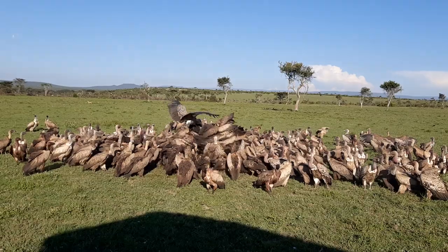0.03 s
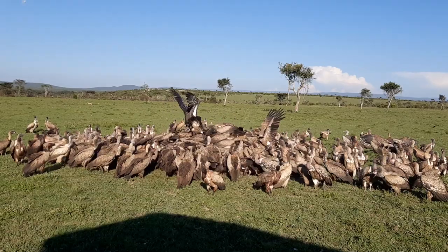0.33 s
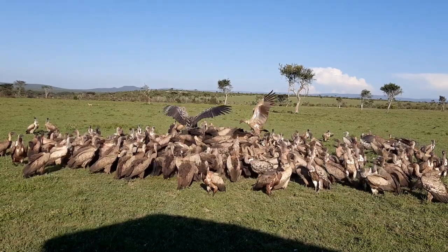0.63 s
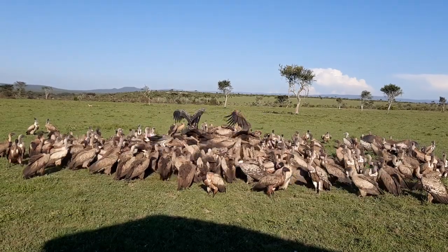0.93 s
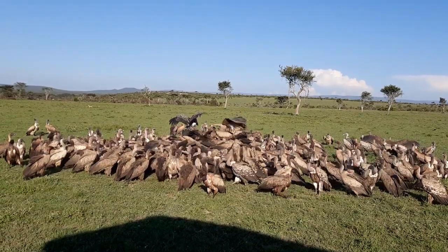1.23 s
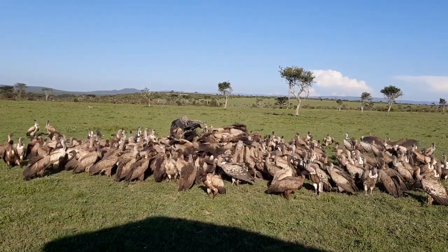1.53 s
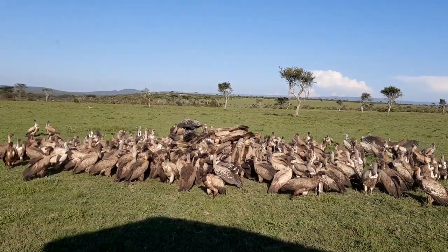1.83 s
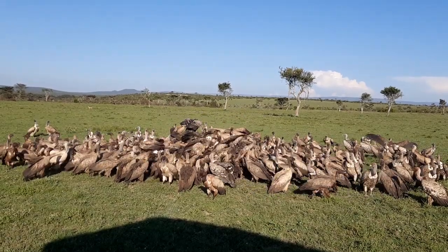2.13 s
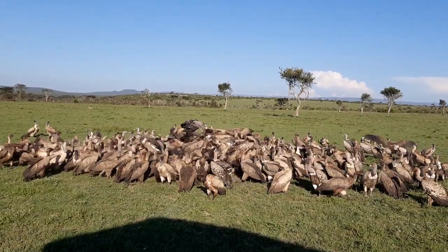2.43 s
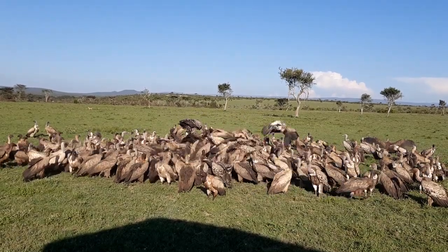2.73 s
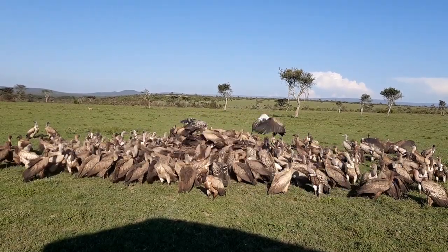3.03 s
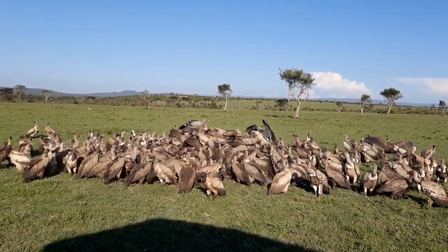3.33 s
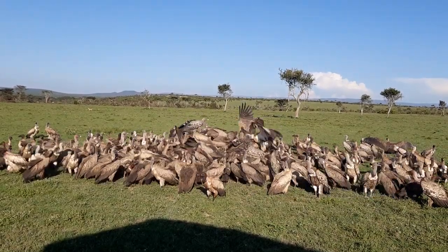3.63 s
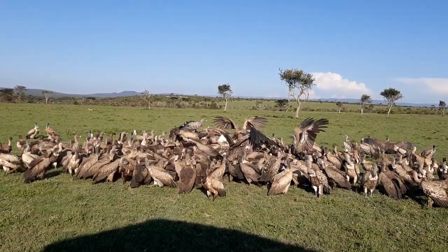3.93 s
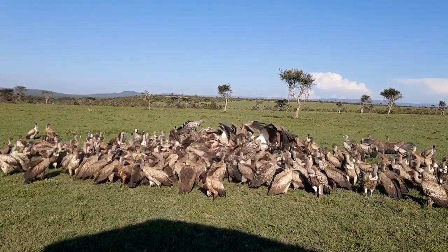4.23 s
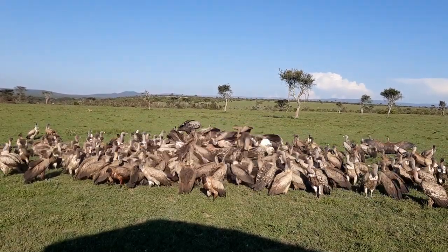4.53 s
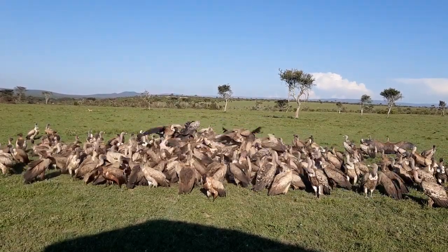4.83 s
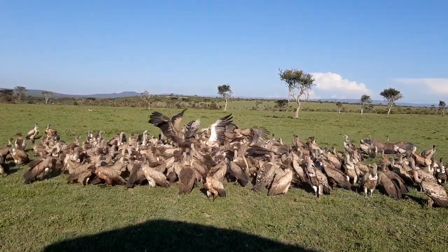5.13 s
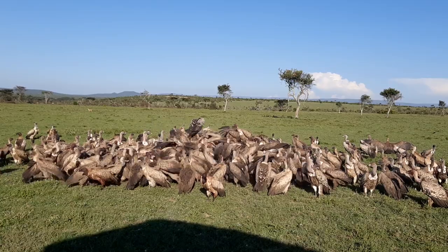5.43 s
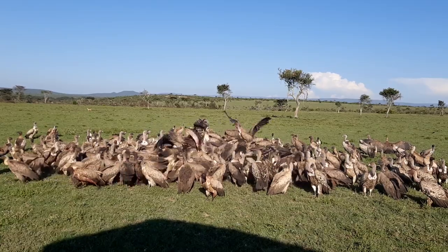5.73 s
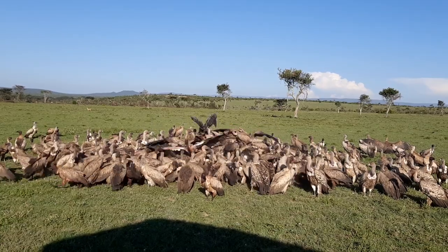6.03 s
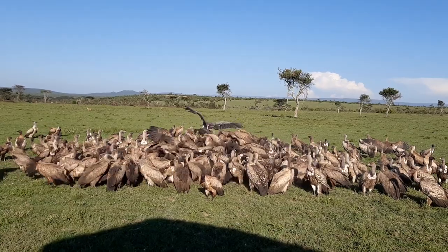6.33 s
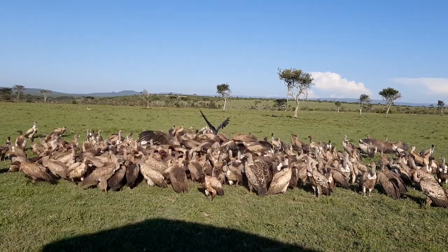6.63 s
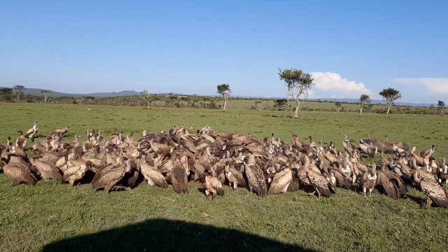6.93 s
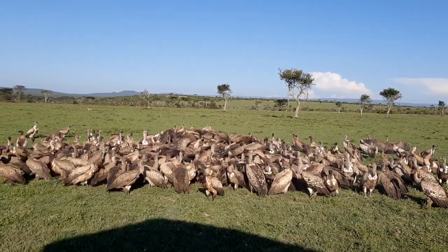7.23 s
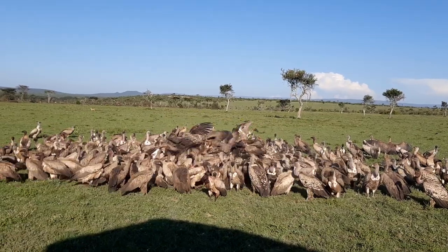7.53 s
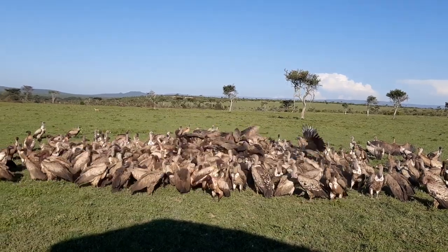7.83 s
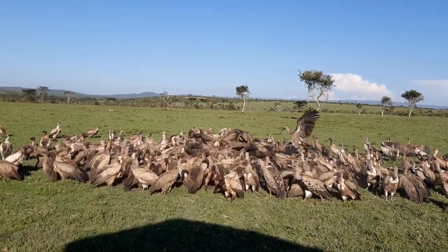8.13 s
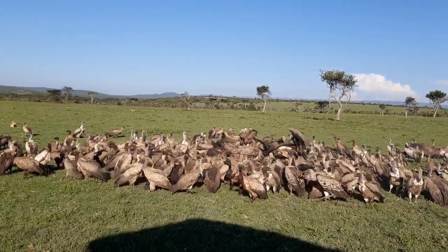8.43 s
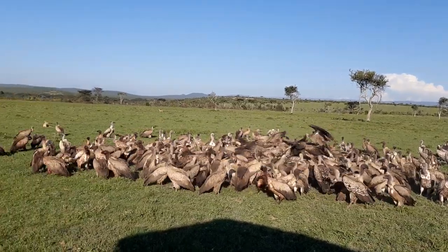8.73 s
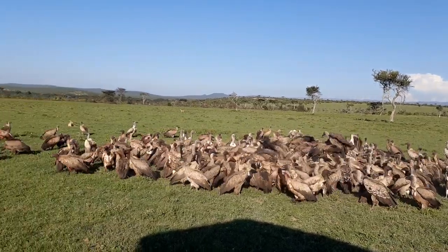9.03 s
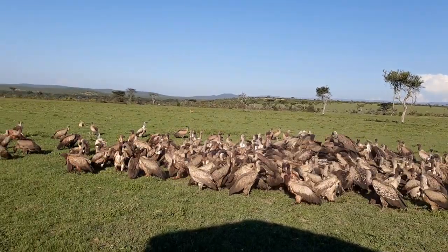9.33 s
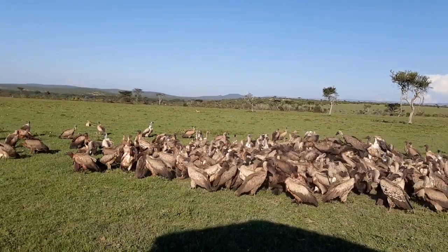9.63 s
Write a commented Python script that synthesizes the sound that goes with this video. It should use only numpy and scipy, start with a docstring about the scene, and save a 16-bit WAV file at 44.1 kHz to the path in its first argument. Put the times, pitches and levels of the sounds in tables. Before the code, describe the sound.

Gusty wind rumbles on the microphone while squabbling vultures give hoarse hisses and rough, falling screeches among dull wing thumps.

```python
"""Vultures squabble over a carcass on open grassland, some metres away, while gusts buffet the microphone.
First they hiss, forcing air through throat and bill, and one screeches. At 3 s come rattling rasps,
then cackles. From 4.7 s they screech again and again, each with two rough, falling tones at once.
Around 6 s bills snap and wings thump. More hisses, brief thin rings near 2 kHz and a last screech
follow; after 9 s the wind dies down. Feet scuffle and feathers rustle all the way through."""
import sys
import numpy as np
from scipy import signal
from scipy.fft import rfft, irfft, next_fast_len
from scipy.io import wavfile
from scipy.ndimage import map_coordinates

SR = 44100
rng = np.random.default_rng(int(sys.argv[2]) if len(sys.argv) > 2 else 0)


def dump_mix(stems):
    """Bounce the given channels to the path in sys.argv[1] as a 16-bit WAV at rate SR."""
    frames = np.atleast_2d(stems).T  # one column per channel
    limited = np.clip(frames, -1, 1)  # hard clip at full scale
    pcm = np.round(limited * 32767).astype(np.int16)
    wavfile.write(sys.argv[1], SR, pcm)


N = 431738
TIME = np.arange(N) / SR
WANDER_SHARE, WANDER_PER_S = 0.01654, 35   # a slack throat keeps changing shape, so its pitch wanders

# Tone colour of brushing feathers: pitch_hz, level_db
FEATHER_SPECTRUM = [(1410, -48), (2400, -6), (2640, -2), (2880, -2.5), (3380, -5.5), (3740, -4),
                    (4050, 0.5), (5350, 2.5), (7590, -2.5), (8550, -12), (11000, -2), (15100, -5),
                    (16000, -7.5)]
# Tone colour of small swirls of wind at the microphone's two openings (ports): pitch_hz, level_db
BUFFET_SPECTRUM = [(80, -20), (170, -3), (330, -2.5), (480, -8), (700, -26), (1200, -37), (3000, -76)]


def screeches():
    """Two membranes sing over the air that drives them. Gives the sound, and a copy weighted by side."""
    # Screeches: start_s, length_s, crest_s (after the start), swell_db; lower tone: top_hz, last_hz,
    # low_db, overtone_db (at the end); upper tone: high_hz, high_db, high_length_s; air, relative levels:
    # throat_db, bill_db, ring_db; jitter_share, scoop_share, side (left is negative)
    calls = [ (0.897, 0.11, 0.0345, 8, 1527, 1495, -36, -26, 2053, -36, 0.38, -43, -46, -22, 0.042, 0.0062, -1.1),
             (4.69, 0.23, 0.12, 7, 1564, 1253, -25, -15, 1682, -26, 0.24, -45.5, -40, 3.5, 0.028, 0.019, 1.0),
             (4.938, 0.23, 0.05, 1, 1297, 1186, -35, -32, 1760, -31, 0.04, -45.5, -52.5, 2, 0.042, 0, -1.1),
             (5.097, 0.25, 0.16, 6.5, 1509, 1210, -31.5, -4, 1670, -37, 0.3, -40.5, -36.5, 7.5, 0.044, 0.13, 1.0),
             (5.515, 0.24, 0.17, 10, 1487, 1287, -26, -4, 1640, -29, 0.3, -41.5, -33, 5, 0.043, 0.1, 1.0),
             (6.385, 0.195, 0.08, 21, 1538, 1160, -35, -15, 1858, -31.5, 0.11, -44.5, -48.5, 0, 0.036, 0.0074, -1.2),
             (7.477, 0.13, 0.046, -4, 1484, 1444, -42, -19, 2003, -41, 0.2, -49.5, -50, -12, 0.061, 0, -1),
             (8.469, 0.22, 0.099, 19.5, 1529, 1207, -28, -28, 1843, -24.5, 0.13, -42.5, -40.5, -4, 0.018, 0.0021, 0.5)]
    # Resonances of the throat, the bill and the bill's ringing: pitch_hz, width_hz, level_db
    throat_modes = [(794, 164, -1.5), (1092, 145, 7), (1462, 173, 9), (2034, 134, 5.5)]
    bill_modes = [(2390, 710, 1.5), (3290, 170, 3.5), (3654, 90, 8.5), (4024, 63, 8), (4510, 200, 1),
                  (4930, 104, 7), (5450, 280, -0.5), (6430, 2260, -7), (12200, 3900, -14)]
    ring_modes = [(2741, 69, 3.8), (2987, 190, 1.4)]
    throat, bill = airflow(throat_modes, rattle_db=3.5), airflow(bill_modes, rattle_db=2.5)
    ring = airflow(ring_modes, rattle_db=1.0)
    out, flutter = np.zeros((2, N)), membrane_flutter()
    chop = rms_one(1 + 0.66 * (throat_rattle() - 1))
    wander = WANDER_SHARE * drift(WANDER_PER_S)
    warble_hz, fall_hz_per_s = 36, 1600
    for (start_s, length_s, crest_s, swell_db, top_hz, last_hz, low_db, overtone_db, high_hz, high_db,
         high_length_s, throat_db, bill_db, ring_db, jitter, scoop, side) in calls:
        now, age, opening, push_db = breath(start_s, length_s, crest_s, -swell_db, -0.81 * swell_db)
        # The lower tone scoops up, warbles, then sinks ever faster and turns harsher.
        sunk = np.interp(age, [crest_s - 0.0338, length_s], [0, 1]) ** 1.35
        warble = 0.52 * jitter * np.sin(2 * np.pi * (warble_hz * age + rng.random())) * (1 - sunk)
        low_hz = (top_hz + (last_hz - top_hz) * sunk) * (1 - scoop * np.exp(-age / 0.045) + warble)
        low = from_db(low_db + push_db) * rough_tone(low_hz, jitter, overtone_db - 13 * (1 - sunk), flutter)
        # The upper tone falls steadily and swells around the crest.
        high = rough_tone(high_hz - fall_hz_per_s * (age - crest_s), jitter, -24, flutter)
        high *= from_db(high_db) * bell(age - crest_s, high_length_s)
        # The throat's resonances follow the lower tone; the stiff bill follows less.
        fall = low_hz / 1450
        throat_air = from_db(throat_db + 6 + 0.45 * push_db) * glide(throat[now.start:], fall ** 0.35)
        bill_air = glide(bill[now.start:], fall ** 0.28 + wander[now] / 2)
        ringing = from_db(ring_db) * glide(ring[now.start:], fall ** 0.7)
        bill_air = from_db(bill_db + 2.5 + 1.1 * push_db) * rms_one(bill_air + ringing)
        call = opening * (low + high + chop[now] * (throat_air + bill_air))
        out[:, now] += call, side * call
    return out


def rasps():
    """Air rattles through the throat and wide-open bill; a harder push lifts and brightens the call."""
    # Rasps at the front of the crowd: start_s, length_s, crest_s (after the start), throat_db,
    # gullet_db, bill_db, throat_pitch_ratio, bill_pitch_ratio
    calls = [(2.965, 0.18, 0.093, -34.5, -47, -37.5, 1.075, 1.12),
             (3.1, 0.15, 0.034, -39.5, -46.5, -44, 1.01, 1.11),
             (3.201, 0.14, 0.043, -38, -48.5, -46, 1.06, 1.04),
             (3.428, 0.12, 0.069, -48, -64, -55.5, 0.94, 1.01),
             (3.654, 0.13, 0.0878, -38, -51, -45, 1.02, 1.06),
             (3.723, 0.1, 0.042, -36.5, -59, -51, 0.99, 1.1)]
    # Resonances of throat, gullet and bill: pitch_hz, width_hz, level_db
    throat_modes = [(1114, 140, 1.5), (1350, 550, -4), (1543, 76, 1.5), (1726, 81, 5), (2030, 52, 4)]
    gullet_modes = [(746, 115, 3), (970, 150, -9)]
    bill_modes = [(2240, 150, 9.5), (2800, 260, 8.5), (3260, 230, 6), (3860, 340, 4), (4340, 250, 4.5),
                  (4950, 330, 4.5), (5500, 270, 2.5), (7370, 1400, -8), (12100, 4600, -16.5)]
    throat, gullet = airflow(throat_modes, rattle_db=1.0), airflow(gullet_modes, rattle_db=3.0)
    bill = airflow(bill_modes, rattle_db=0.5)
    out, wander = np.zeros(N), WANDER_SHARE * drift(WANDER_PER_S)
    for start_s, length_s, crest_s, throat_db, gullet_db, bill_db, throat_ratio, bill_ratio in calls:
        now, age, opening, push_db = breath(start_s, length_s, crest_s, start_db=-8.5, end_db=-5)
        gape = 1 + 0.07 * push_db + wander[now]   # pushing opens the throat and raises its resonances
        body = from_db(throat_db) * glide(throat[now.start:], throat_ratio * gape)
        body += from_db(gullet_db) * gullet[now]
        bill_air = from_db(bill_db + 1.25 * push_db) * glide(bill[now.start:], bill_ratio * gape)
        out[now] += opening * (from_db(push_db) * body + bill_air)
    return out * throat_rattle()


def hisses():
    """Hoarse breath: each bird favours its own sliding throat resonances; the bill brightens the crest."""
    # Hisses from deeper in the crowd: start_s, length_s, crest_s (after the start); throat resonances:
    # low_db, middle_db, high_db; bill_db, first_pitch_ratio, last_pitch_ratio
    calls = [(0.03, 0.21, 0.052, -61, -61.5, -58, -64, 1.03, 0.97),
             (0.18, 0.18, 0.034, -54, -57, -50.5, -58.5, 1.02, 0.84),
             (0.33, 0.2, 0.034, -49.5, -58, -52.5, -59, 0.97, 1),
             (0.46, 0.14, 0.054, -54, -59, -60, -66, 1, 1.02),
             (0.809, 0.19, 0.042, -46.5, -41, -47.5, -53, 1.09, 0.9),
             (0.967, 0.26, 0.03, -49.5, -51, -52, -56, 0.95, 1.1),
             (2.037, 0.15, 0.076, -61, -57.5, -62, -54.5, 1.0, 1.01),
             (4.409, 0.21, 0.14, -50.5, -50, -51, -57.5, 1.02, 1.03),
             (4.581, 0.18, 0.13, -41.5, -41, -47.5, -53, 1.03, 1.03),
             (6.945, 0.16, 0.047, -53.5, -60, -59, -64.5, 1.04, 0.92),
             (7.031, 0.218, 0.17, -49, -51, -49.5, -55, 1.0, 0.96),
             (7.17, 0.24, 0.12, -41, -43, -43.5, -52.5, 1.0, 0.99),
             (7.359, 0.2, 0.054, -42, -43.5, -46.5, -61, 1, 1.12),
             (7.719, 0.19, 0.051, -53, -53, -55, -57.5, 1.07, 0.94),
             (9.66, 0.16, 0.086, -75, -67, -62.5, -73, 1.05, 1.05)]
    # Resonances of throat, gullet and bill: pitch_hz, width_hz, level_db
    throat_modes = [(1090, 143, 0), (1447, 110, 0), (1807, 216, 0)]
    gullet_modes = [(750, 200, -0.5), (1280, 280, -1.5)]
    bill_modes = [(2637, 250, 12.5), (3280, 3100, 1), (4230, 1500, 3)]
    throat = np.array([airflow([mode], rattle_db=1.5) for mode in throat_modes])
    throat[0] += from_db(-8.5) * airflow(gullet_modes, rattle_db=1.5)   # breath under the low resonance
    bill = airflow(bill_modes, rattle_db=2.0)
    out, wander = np.zeros(N), WANDER_SHARE * drift(WANDER_PER_S)
    for start_s, length_s, crest_s, *throat_db, bill_db, first_ratio, last_ratio in calls:
        now, age, opening, push_db = breath(start_s, length_s, crest_s, start_db=-7, end_db=-12.5)
        slide = np.linspace(first_ratio, last_ratio, len(age)) + wander[now]
        voice = glide(from_db(throat_db) @ throat[:, now.start:now.stop + SR // 10], slide)
        out[now] += opening * (from_db(push_db) * voice + from_db(bill_db + 1.16 * push_db) * bill[now])
    return out


def single_tones(jitter, overtone_db):
    """Rough tones swell and fade: sliding squeals, and brief thin ringing of a resonance near 2 kHz."""
    # Tones (those near 2030 Hz are the ringing): start_s, length_s, level_db, first_hz, last_hz
    tones = [(0.203, 0.18, -52.5, 1272, 1055), (0.482, 0.11, -53, 1160, 1035),
             (0.896, 0.11, -40.5, 2450, 2620), (3.032, 0.048, -39.5, 2467, 2420),
             (3.234, 0.039, -40, 2050, 2025), (3.778, 0.024, -39.5, 2000, 2030),
             (4.439, 0.12, -46, 1620, 1414), (4.6, 0.114, -46.5, 714, 655), (4.954, 0.14, -45.5, 960, 850),
             (5.29, 0.087, -48, 1191, 834), (6.966, 0.117, -53.5, 1140, 1020),
             (7.09, 0.091, -45, 1830, 1784), (7.122, 0.17, -56, 2690, 2735), (7.185, 0.09, -41, 1490, 1440),
             (7.22, 0.16, -46, 1110, 1036)]
    out, flutter = np.zeros(N), membrane_flutter()
    for start_s, length_s, level_db, first_hz, last_hz in tones:
        hz = np.linspace(first_hz, last_hz, int(length_s * SR))
        tone = rough_tone(hz, jitter * np.sqrt(1200 / hz), overtone_db, flutter)
        at = int(start_s * SR)
        out[at:at + len(hz)] += from_db(level_db) * tone * np.hanning(len(hz)) ** 0.5
    return out


def breath(start_s, length_s, crest_s, start_db, end_db):
    """One call: its samples, their age, the bill's opening, and a push that swells to 0 dB and ebbs."""
    attack_s, release_s = 0.035, 0.041
    now = slice(int(start_s * SR), min(int((start_s + length_s) * SR), N))
    age = TIME[now] - start_s
    ramp = np.clip(np.minimum(age / attack_s, (length_s - age) / release_s), 0, 1)
    push_db = np.interp(age, [0, min(crest_s, length_s), length_s], [start_db, 0, end_db])
    return now, age, np.sin(np.pi / 2 * ramp) ** 2, push_db


def rough_tone(hz, jitter, overtone_db, flutter):
    """A tone with two overtones, wavering in pitch and strength."""
    start = int(rng.random() * (N - SR))
    quick, waver, shimmer = flutter[:, start:start + len(hz)]
    phase = 2 * np.pi * np.cumsum(hz * (1 + jitter * quick + waver)) / SR
    overtones = np.sin(2 * phase) + 0.65 * np.sin(3 * phase)
    return rms_one(shimmer * (np.sin(phase) + from_db(overtone_db) * overtones))


def membrane_flutter():
    """A loosely driven membrane is unsteady: quick pitch jitter, slow pitch waver, shimmering strength."""
    return np.array([drift(1100), 0.00633 * drift(60), from_db(2.5 * drift(240))])


def airflow(modes, rattle_db):
    """Rushing air rattles unevenly through sharp resonances and then the windpipe."""
    rattle = from_db(rattle_db * drift(330))
    air = sum(from_db(db) * resonate_twice(rng.standard_normal(N) * rattle, hz, 1.24 * width_hz)
              for hz, width_hz, db in modes)
    return rms_one(windpipe(air))


def windpipe(x, spacing_hz=498, echo_share=0.19):
    """Sound runs up and down the long windpipe, which leaves a row of evenly spaced resonances."""
    size = next_fast_len(N)
    round_trip = np.exp(-2j * np.pi * np.fft.rfftfreq(size, 1 / SR) / spacing_hz)
    return irfft(rfft(x, size) / (1 - echo_share * round_trip), size)[:N]


def throat_rattle(puffs_per_s=300, jitter=0.46, rattle_db=1.5, flutter_db=1.5):
    """A slack throat chops the air into uneven puffs and flutters more slowly; gives a gain."""
    phase = 2 * np.pi * np.cumsum(puffs_per_s * (1 + jitter * drift(200))) / SR
    return rms_one(from_db(rattle_db * np.cos(phase) + flutter_db * drift(130)))


def cackles():
    """Quick puffs of air through a broad resonance sound hoarse."""
    # Cackles: start_s, length_s, level_db, pitch_hz
    notes = [(3.812, 0.049, -41, 1360), (3.883, 0.017, -46, 1450), (3.898, 0.025, -42, 1370),
             (3.943, 0.01, -41.5, 1430), (3.958, 0.019, -41.5, 1310), (4.018, 0.011, -48, 1390),
             (4.031, 0.017, -52, 1340)]
    return short_notes(notes, width_share=0.66, upper_ratio=2.09, upper_width_share=0.32, upper_db=-8.5)


def thin_rings():
    """A fixed resonance near 2 kHz rings briefly and thinly; a few high notes and soft hoots join it."""
    # Short narrow notes: start_s, length_s, level_db, pitch_hz
    notes = [(1.165, 0.036, -62, 4270), (2.35, 0.12, -57.5, 7330), (2.45, 0.099, -56.5, 1000),
             (3.33, 0.12, -64, 2070), (7.607, 0.021, -45.5, 2030), (7.945, 0.027, -59, 2060),
             (8.135, 0.022, -63, 2040), (8.22, 0.034, -53, 2050), (8.32, 0.029, -56.5, 1970),
             (8.432, 0.082, -50.5, 1900), (8.68, 0.025, -55.5, 2010), (8.912, 0.051, -61, 497),
             (8.92, 0.06, -61, 5200)]
    return short_notes(notes, width_share=0.12, upper_ratio=2.16, upper_width_share=0.64, upper_db=-10.0)


def short_notes(notes, width_share, upper_ratio, upper_width_share, upper_db):
    """Brief bursts of noise pass through a main resonance and a weaker one above it."""
    out = np.zeros(N)
    for start_s, length_s, level_db, hz in notes:
        burst = rng.standard_normal(SR // 4)[:int(length_s * SR)]
        ring = rms_one(resonate_twice(burst, hz, width_share * hz))
        upper = rms_one(resonate(burst, min(upper_ratio * hz, SR / 3), upper_width_share * hz))
        swell = np.sin(np.linspace(0, np.pi, len(burst))).clip(0) ** 0.26
        at = int(start_s * SR)
        out[at:at + len(burst)] += from_db(level_db) * swell * (ring + from_db(upper_db) * upper)
    return out


def bill_snaps(swish_s=0.037):
    """A bird lunges: its feathers swish and its bill snaps."""
    # Bill clicks and snapping sinew: start_s, relative_db, pitch_hz, crack_db (against the ring)
    clicks = [(0.713, -47, 1300, -3), (0.797, -40, 2080, 0), (2.322, -39, 1930, -9.5), (2.94, -44, 5100, 3),
              (3.184, -33, 1530, 0), (3.819, -36, 4500, -5), (4.992, -39.5, 4960, 4),
              (5.452, -43.5, 1720, -3), (5.945, -35.5, 1500, -7), (5.951, -31.5, 1480, -9),
              (6.145, -34.5, 1620, -1), (6.152, -47, 1820, -9), (6.165, -39.5, 1360, -6),
              (6.179, -39, 1540, -1), (6.205, -36, 840, -16), (8.008, -33.5, 1080, -10),
              (8.052, -41, 1060, -1), (8.238, -39, 5500, -9), (8.723, -53, 4580, -3)]
    feathers = rms_one(colour(rng.standard_normal(N) * from_db(9.9 * drift(340)), FEATHER_SPECTRUM))
    lunges = sum(from_db(db + crack_db - 12) * bell(TIME - start_s, swish_s)
                 for start_s, db, _, crack_db in clicks)
    return lunges * feathers + blows(clicks, decay_s=0.0092, width_share=0.56, gain_db=-7.0)


def wing_thumps(crack_db=-45):
    """A soft wing lands a dull blow with next to no crack."""
    # Wing beats and blows: start_s, relative_db, pitch_hz
    beats = [(1.219, -29, 685), (2.271, -38.5, 400), (3.545, -35.5, 596), (3.628, -40.5, 497),
             (4.02, -42, 318), (5.949, -32.5, 604), (6.138, -31, 450), (7.58, -33, 600), (7.613, -33, 515)]
    return blows([(*beat, crack_db) for beat in beats], decay_s=0.0045, width_share=1.04, gain_db=-4.5)


def blows(hits, decay_s, width_share, gain_db):
    """Each hit is a burst that dies at once: a broad ring and a short bright crack."""
    out, age = np.zeros(N + SR), np.arange(SR // 8) / SR
    for start_s, db, hz, crack_db in hits:
        noise = rng.standard_normal(len(age))
        ring = resonate_twice(noise * np.exp(-age / decay_s), hz, width_share * hz)
        crack = from_db(crack_db) * noise * np.exp(-age / 0.0041)
        at = int(start_s * SR)
        out[at:at + len(age)] += from_db(db + gain_db) * (ring / np.abs(ring).max() + crack)
    return out[:N]


def open_field(x, sideways, scatter_db, scatter_s):
    """Sound from the side reaches the two ports out of step; ground and bodies scatter short echoes."""
    # Strength of the left-right difference for sound from the crowd: pitch_hz, level_db
    width_spectrum = [(500, -7), (1050, -22), (1450, 1), (1800, -11.5), (2200, 3.5), (2900, -8),
                      (4000, -0.5), (5500, 3), (8000, 0), (15000, -0.5)]
    age = np.arange(SR // 5) / SR
    echoes = rng.standard_normal((2, len(age))) * np.exp(-age / scatter_s) * (age > .002)
    echoes /= np.sqrt(np.sum(echoes ** 2, axis=1, keepdims=True))
    shifted = signal.hilbert(sideways, next_fast_len(N)).imag[:N]   # a quarter of a cycle late
    side = colour(shifted + 0.027 * sideways, width_spectrum)   # plus a slight difference in level
    scattered = signal.fftconvolve(x[None], echoes, axes=1)[:, :N]
    return x + side * [[1], [-1]] + from_db(scatter_db) * scattered


def wind_slaps():
    """A strong swirl of air hits both ports as one short thud, and breaks into a crackle at each."""
    # Single swirls: crest_s, length_s, thud_db, crackle_db, pan_db (left against right)
    swirls = [(0.077, 0.014, -33, -32, -7), (0.121, 0.05, -35, -35, -7), (0.15, 0.07, -33, -45.5, 2),
              (0.325, 0.073, -35, -46, -1), (0.411, 0.095, -38, -54, 12), (0.669, 0.05, -37, -57, -9),
              (1.255, 0.064, -33, -42, -12), (1.337, 0.013, -30.5, -59, -1),
              (1.42, 0.078, -35.5, -39.5, -2), (1.49, 0.02, -43, -36, -4), (1.546, 0.077, -29.5, -42.5, 4),
              (1.602, 0.053, -27, -32.5, -5), (1.7, 0.043, -32.5, -40, 4), (1.845, 0.021, -29.5, -54, 3),
              (1.966, 0.016, -34.5, -59, 2), (3.135, 0.06, -27, -41.5, -2), (3.262, 0.042, -37, -46, -10),
              (3.5, 0.1, -37, -42, 1), (3.713, 0.056, -36.5, -60, 17), (3.824, 0.015, -38, -33.5, -1),
              (3.898, 0.039, -30.5, -54, -2), (4.04, 0.047, -37, -36, -1.5),
              (4.072, 0.047, -42, -41.5, -10), (4.357, 0.091, -38, -44.5, -3),
              (4.845, 0.095, -32, -49.5, 3), (5.314, 0.024, -32.5, -45, -5), (5.476, 0.042, -29, -44.5, -7),
              (5.566, 0.07, -42, -45, -2), (6.011, 0.032, -36, -62, -4), (6.062, 0.025, -32.5, -37, -3),
              (6.107, 0.028, -48, -36, 0), (6.558, 0.1, -43, -47, -3), (6.799, 0.052, -43, -43, -2),
              (6.933, 0.042, -33, -53, 6), (7.057, 0.032, -33.5, -44.5, 8), (7.507, 0.04, -41, -44, -7),
              (7.823, 0.02, -33, -44, -3), (7.957, 0.03, -36, -44, 3), (9.753, 0.075, -46, -62, 1)]
    # Tone colour of the thud: pitch_hz, level_db
    thud_spectrum = [(20, -37), (40, -8.5), (70, 4), (120, -5), (180, -9), (300, -32), (600, -62)]
    thud = stereo_noise(thud_spectrum, lumps_db=-0.5, lumps_per_s=49, shared=0.99)
    crackle = stereo_noise(BUFFET_SPECTRUM, lumps_db=5.5, lumps_per_s=160, shared=0.33)
    out = np.zeros((2, N))
    for crest_s, length_s, thud_db, crackle_db, pan_db in swirls:
        now = np.flatnonzero(np.abs(TIME - crest_s) < length_s / 2)
        swell = bell(TIME[now] - crest_s, length_s)
        pan = rms_one(from_db([[pan_db / 2], [-pan_db / 2]]))
        burst = from_db(thud_db) * rms_one(swell * thud[:, now])
        burst += from_db(crackle_db) * rms_one(swell * crackle[:, now])
        out[:, now] += pan * burst * np.sqrt(np.mean(swell ** 2))
    return out


def breeze():
    """Unsteady wind: large swirls rumble, small ones buffet the ports."""
    # Relative strength of the wind: time_s, rumble_db, buffet_db
    strength = [(0.0, -42.5, -48.5), (0.2, -44.5, -52.5), (0.6, -48.5, -59.5), (1.17, -46.5, -56.5),
                (1.26, -50, -51.5), (1.52, -42.5, -43.5), (1.78, -49.5, -61), (2.1, -50.5, -55.5),
                (2.78, -53, -64.5), (3.2, -42, -50), (3.65, -50, -55), (4.02, -44.5, -48),
                (4.15, -53, -62.5), (4.7, -51, -55), (4.88, -50.5, -57), (5.06, -48.5, -56),
                (5.3, -45.5, -49.5), (5.39, -49.5, -61.5), (5.52, -47.5, -50.5), (5.8, -41, -53),
                (5.9, -58, -67), (6.08, -40.5, -48), (6.28, -57.5, -60), (6.65, -51.5, -55),
                (7.0, -48.5, -52), (7.6, -51, -55), (7.83, -42, -52.5), (8.1, -56, -64.5), (8.65, -55, -64),
                (9.1, -65.5, -75), (9.79, -67.5, -80)]
    # Tone colour of the rumble: pitch_hz, level_db
    rumble_spectrum = [(15, -45), (30, -14), (60, 0.5), (100, -3), (150, -9), (230, -27.5), (500, -48.5)]
    rumble_db, buffet_db = in_time(strength)
    gusts = from_db(3.8 * drift(22))
    rumble = stereo_noise(rumble_spectrum, lumps_db=1.0, lumps_per_s=28, shared=0.13)
    buffet = stereo_noise(BUFFET_SPECTRUM, lumps_db=5.0, lumps_per_s=80, shared=0.19)
    return gusts * (from_db(rumble_db + 0.3) * rumble + from_db(buffet_db + 0.56) * buffet)


def jostling():
    """Feet scuffle in the grass and feathers brush against each other."""
    # Loudness of the jostling crowd: time_s, scuffle_db, rustle_db
    bustle = [(0, -66, -60), (2.7, -62.5, -61.5), (7.8, -60.5, -60.5), (9.2, -65, -63)]
    # Tone colour of feet in grass: pitch_hz, level_db
    scuffle_spectrum = [(300, 1.5), (700, 2.5), (1100, 3.5), (1550, 4), (2050, 3.5), (2500, -8),
                        (3500, -2.5), (6000, -19)]
    scuffle_db, rustle_db = in_time(bustle)
    scuffle = stereo_noise(scuffle_spectrum, lumps_db=3.5, lumps_per_s=55, shared=0.61)
    rustle = stereo_noise(FEATHER_SPECTRUM, lumps_db=1.86, lumps_per_s=52, shared=0.047)
    return from_db(scuffle_db) * scuffle + from_db(rustle_db) * rustle


def grass_ticks(per_s, gain_db, decay_s=0.00059):
    """Dry stalks and quills tick underfoot, mostly faintly."""
    ticks = (rng.random(N) < per_s / SR) * from_db(2.7 * np.minimum(rng.exponential(1, N), 3))
    bursts = signal.lfilter([1], [1, -np.exp(-1 / (decay_s * SR))], ticks + 1e-18)
    return from_db(gain_db) * resonate(bursts * rng.standard_normal(N), hz=6000, width_hz=6730)


def stereo_noise(spectrum, lumps_db, lumps_per_s, shared):
    """Lumpy noise at the two ports, partly shared; their average has strength one."""
    white = np.array([rng.standard_normal(N) * from_db(lumps_db * drift(lumps_per_s)) for _ in range(3)])
    pair = colour(white[:2] + shared * white[2], spectrum)
    return pair / np.std(pair.mean(axis=0))


def colour(x, spectrum):
    """Filter by a table of pitch_hz, level_db."""
    hz, db = np.transpose(spectrum)
    size = next_fast_len(N)
    bins = np.maximum(np.fft.rfftfreq(size, 1 / SR), 1)
    gain = from_db(np.interp(np.log(bins), np.log(hz), db))
    return irfft(rfft(x, size) * gain, size)[..., :N]


def resonate(x, hz, width_hz):
    """A resonance: lets through a band around one pitch."""
    r = np.exp(-np.pi * width_hz / SR)
    feedback = [1, -2 * r * np.cos(2 * np.pi * hz / SR), r * r]
    return signal.lfilter(np.array([1, 0, -1]) * (1 - r * r) / 2, feedback, x)


def resonate_twice(x, hz, width_hz):
    """Two passes give a resonance with steeper sides."""
    return resonate(resonate(x, hz, width_hz), hz, width_hz)


def glide(x, ratio):
    """Slide all the resonances of a noise by reading it at a changing speed."""
    return map_coordinates(x, [np.cumsum(ratio) % (len(x) - 1)], order=3)


def drift(turns_per_s):
    """A random wander of strength one."""
    turns = rng.standard_normal(N // 8)
    return rms_one(np.interp(TIME * turns_per_s, np.arange(len(turns)), turns))


def bell(age, length_s):
    """A smooth swell that reaches one at age zero."""
    return np.cos(np.pi * np.clip(age / length_s, -.5, .5)) ** 2


def in_time(rows):
    """Join timed rows with straight lines: one curve for each column after the time."""
    times, *columns = np.transpose(rows)
    return [np.interp(TIME, times, column) for column in columns]


def from_db(db):
    """Decibels to gain."""
    return 10 ** (np.asarray(db) / 20)


def rms_one(x):
    """Scale to an average strength (rms) of one."""
    return x / np.sqrt(np.mean(x ** 2) + 1e-20)


def scene():
    """The birds out on the grass, hissing on the left and rasping on the right; wind at the microphone."""
    right = cackles() + thin_rings() + wing_thumps()
    screech, screech_sideways = screeches()
    left = hisses() + single_tones(jitter=0.049, overtone_db=-22.0)
    right += rasps() + bill_snaps() + grass_ticks(per_s=10, gain_db=-80)
    sideways = screech_sideways - 0.85 * left + right
    squabble = open_field(screech + left + right, sideways, scatter_db=-5.5, scatter_s=0.01)
    return squabble + jostling() + breeze() + wind_slaps()


def record(dry):
    """The highest treble is cut off steeply."""
    cutoff_hz = 15850
    return signal.sosfilt(signal.ellip(10, .2, 70, cutoff_hz, fs=SR, output="sos"), dry)


dry = scene()
out = record(dry)
dump_mix(out)
```